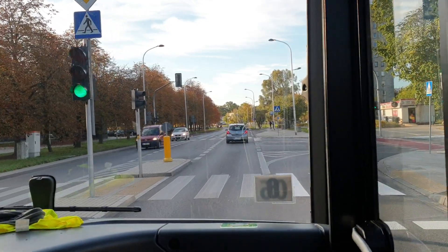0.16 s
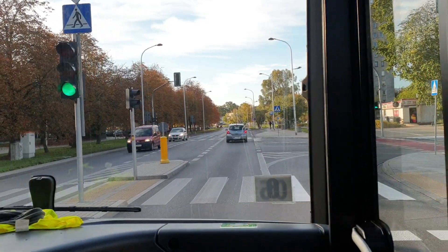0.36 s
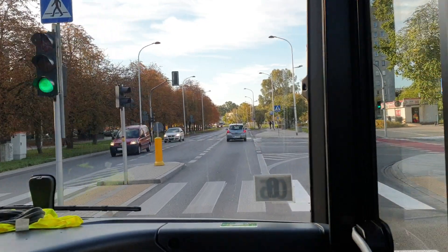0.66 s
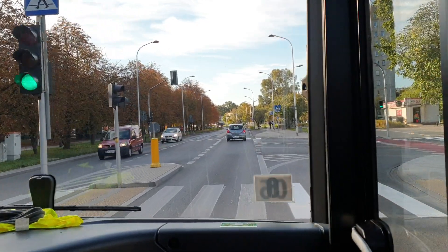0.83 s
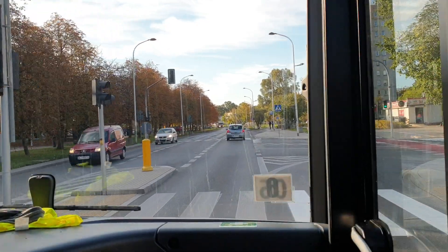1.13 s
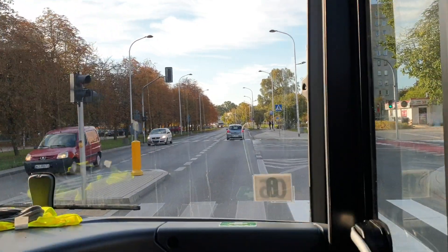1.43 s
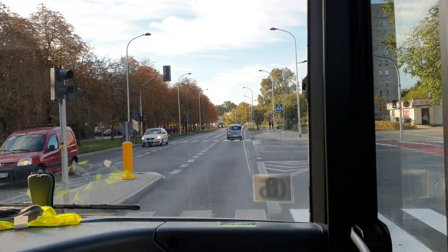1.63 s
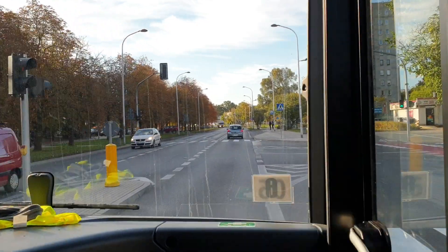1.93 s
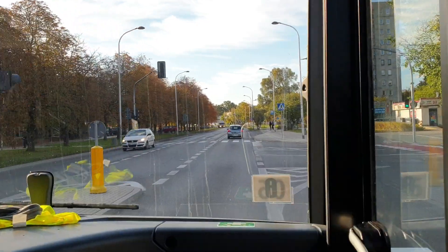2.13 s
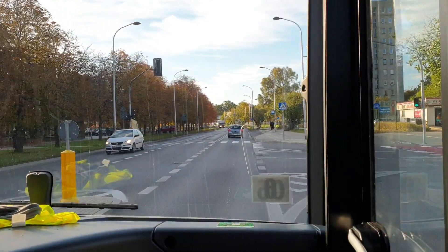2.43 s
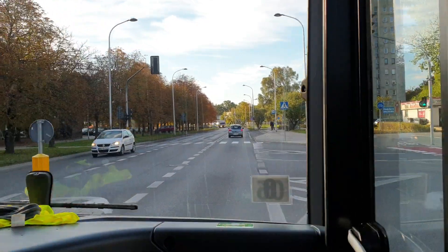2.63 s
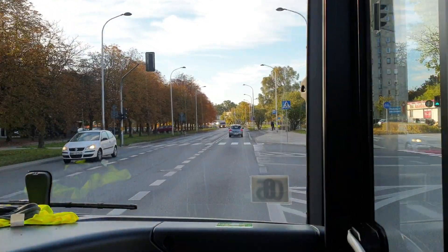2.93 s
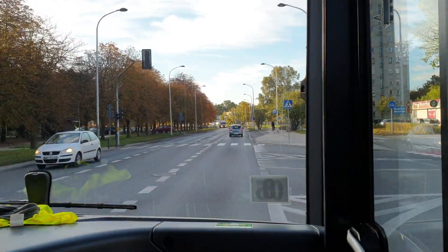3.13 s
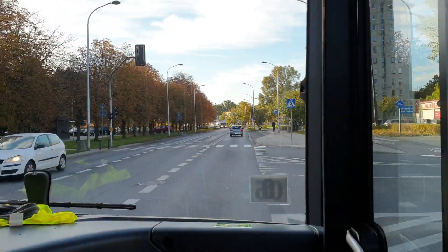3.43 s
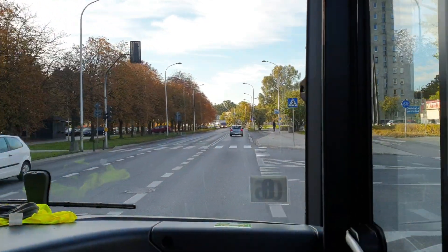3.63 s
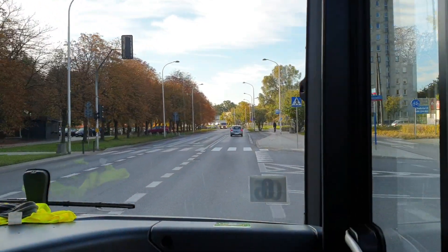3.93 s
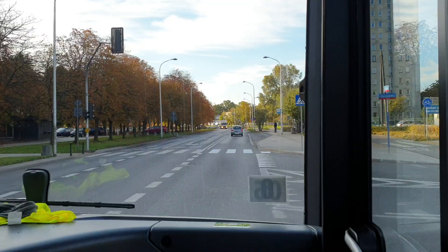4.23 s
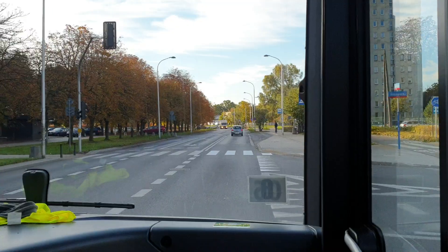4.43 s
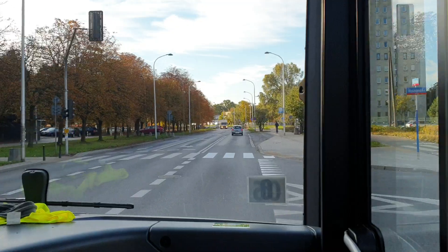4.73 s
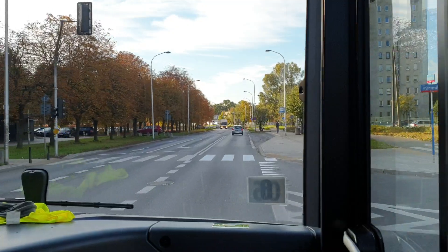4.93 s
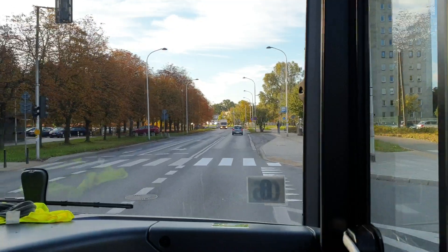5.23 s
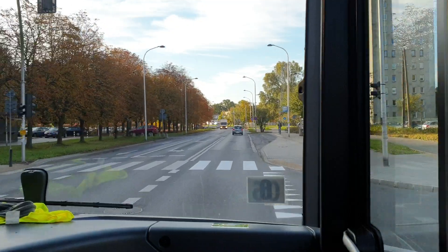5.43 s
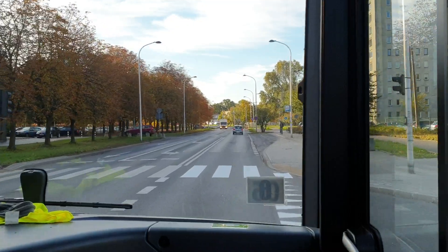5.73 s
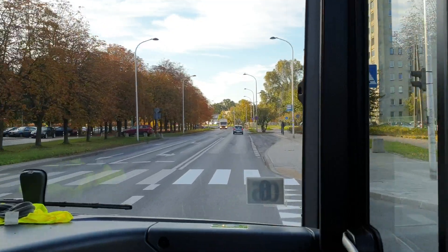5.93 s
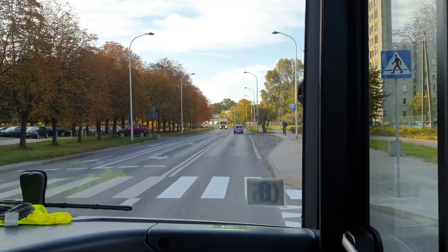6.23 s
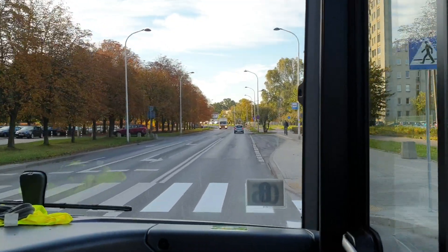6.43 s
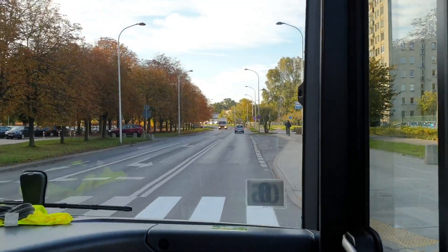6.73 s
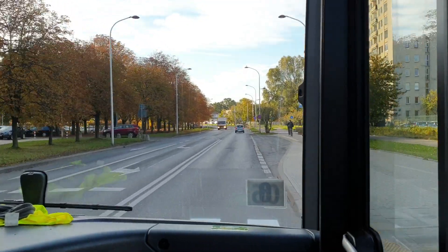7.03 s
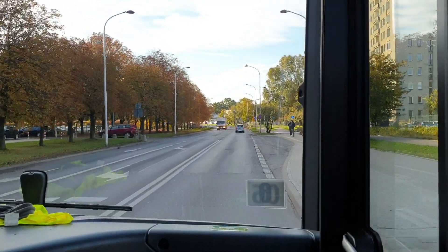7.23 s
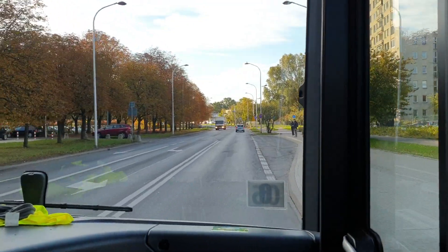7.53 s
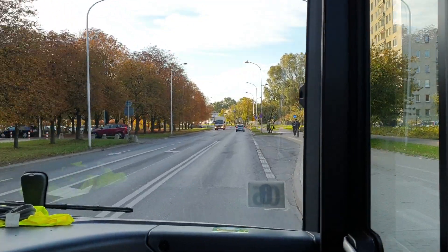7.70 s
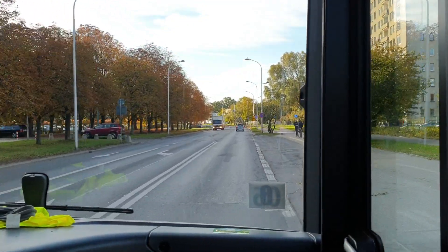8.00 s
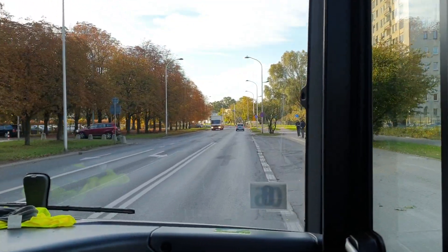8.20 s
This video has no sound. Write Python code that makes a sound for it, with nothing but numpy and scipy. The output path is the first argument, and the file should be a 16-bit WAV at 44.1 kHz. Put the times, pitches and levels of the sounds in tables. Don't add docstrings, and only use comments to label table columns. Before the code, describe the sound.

Steady low compressor drone inside an accelerating electric bus, with faint rising gear whine, tyre rumble, increasing panel rattle on the right and small air puffs.

```python
import sys
import numpy as np
from scipy import signal
from scipy.fft import rfft, irfft, next_fast_len
from scipy.io import wavfile
from scipy.ndimage import uniform_filter1d, map_coordinates

SR = 44100
rng = np.random.default_rng(int(sys.argv[2]) if len(sys.argv) > 2 else 0)


def invert_db(x):
    u = np.asarray(x, float) / 20
    return 10 ** u


def generate_wav(sig):
    pcm = np.round(np.clip(np.atleast_2d(sig).T, -1, 1) * 32767).astype(np.int16)
    wavfile.write(sys.argv[1], SR, pcm)


N = 368675

# (time [s], frequency [Hz])
GEAR_WHINE = [(0, 900), (1.1, 1330), (1.7, 1560), (2.4, 1790), (3.0, 1980), (3.8, 2170), (4.78, 2385),
              (5.1, 2445), (5.5, 2515), (5.9, 2548), (8.36, 2560)]
# (time [s], force on the low knock [1], on the body [1], on the edge [1])
PANEL_TAPS = [(3.0361, .1, 0.54, .6), (3.0779, 0.24, 1.3, .71), (3.256, .1, 0.36, .1),
              (3.494, 1.11, 1.8, 0.99), (3.6017, 1.1, 1.4, 0.91), (3.9409, .48, .75, .84),
              (3.9975, 0.11, .4, 0.47), (4.2714, 0.78, .99, 0.78), (4.3616, 0.67, 1.2, 0.98),
              (4.531, 0.93, 0.75, 1.2), (4.6272, 1.1, 0.38, 1.49), (4.7274, .83, 1.1, 0.5),
              (5.6879, 1, 0.55, 0.5), (5.7707, 1.28, 0.59, .9), (5.8306, .47, 1, 0.79),
              (5.8698, 1.9, 1.9, 1.02), (5.9204, .33, .78, 0.46), (5.9804, 0.58, 1.02, 1.3),
              (6.237, 0.87, 0.11, 1.28), (6.4527, 1, 0.51, .1), (6.6808, .4, 1.1, 0.55),
              (6.9888, 1.1, 0.95, 2.1), (7.13, 1.81, 1.9, 1.9), (7.6321, .1, 0.81, .49),
              (7.678, 1.6, 1.29, 1.88), (7.7216, .52, 1, 1), (7.8968, 1.3, 2.3, 0.4),
              (8.0092, 0.99, 1.7, 1.8), (8.1116, 1.2, 1.1, 0.84), (8.1653, 0.48, .61, .89),
              (8.2256, 1.46, 0.9, .18), (8.2728, 0.18, 0.84, .82), (8.3273, 1.33, 1.3, 0.43)]


def unit(x):
    return x / np.sqrt(np.mean(x ** 2) + 1e-20)


def along(points, hz):
    f, v = np.transpose(points)
    return np.interp(np.log(hz + 1), np.log(f + 1), v)


def shaped(spectrum):
    return lambda hz: invert_db(along(spectrum, hz))


def curves(rows):
    s, *cols = np.transpose(rows)
    return [np.interp(np.arange(N) / SR, s, c) for c in cols]


def wobble(rate_hz):
    knots = rng.standard_normal(int(N * 40 / SR) + 4)
    return map_coordinates(knots, [np.arange(N) * min(rate_hz, 40) / SR])


def gate(on_s, off_s, fade_s):
    t = np.arange(N) / SR
    opening = 1 + np.tanh((t - on_s) / fade_s * 2)
    closing = 1 + np.tanh((off_s - t) / fade_s * 2)
    return .25 * opening * closing


def filtered(x, response):
    m = next_fast_len(N + 8192)
    return irfft(rfft(x, m) * response(np.fft.rfftfreq(m, 1 / SR)), m)[..., :N]


def modes(table):
    def response(f):
        return sum((-1) ** k * invert_db(db) * 1j * f * w / (c * c - f * f + 1j * f * w)
                   for k, (c, w, db) in enumerate(table))
    return response


def rush(colour, patchy_db):
    # (frequency [Hz], correlation [1])
    likeness = [(30, 0.98), (60, 0.99), (140, 0.91), (220, 0.97), (340, .55), (530, 0.99), (830, -0.11),
                (1280, -0.78), (1980, 0.097), (3060, .1), (5000, -0.26), (9500, -0.14), (13000, -0.08)]
    # (frequency [Hz], level difference [dB])
    balance = [(60, -4), (220, -3.5), (340, 1), (530, -2.5), (830, 1), (1280, -14), (1980, -2), (3060, -1),
               (5000, -1), (9500, -0.5), (13000, -1)]
    z = signal.stft(rng.standard_normal((2, N)), nperseg=512)[2]
    field = uniform_filter1d(rng.standard_normal(z.shape[1:]), size=5, axis=0)
    field = uniform_filter1d(field, size=8, axis=1)
    pair = signal.istft(z * invert_db(patchy_db * unit(field)), nperseg=512)[1][:, :N]

    def mid_side(hz):
        angle = np.arccos(np.clip(along(likeness, hz), -1, 1)) / 2
        return colour(hz) * np.array([np.cos(angle), np.sin(angle)])

    mid, side = filtered(pair, mid_side)
    lean = lambda hz: invert_db(np.outer([.5, -.5], along(balance, hz)))
    return unit(filtered(np.array([mid + side, mid - side]), lean))


def tone(hz, db, pan_db, lead):
    phase = 2 * np.pi * np.cumsum(hz * np.ones(N)) / SR + 2 * np.pi * rng.random()
    ports = np.sin(phase + np.array([[lead / 2], [-lead / 2]]))
    return np.sqrt(2) * invert_db(db) * invert_db([[pan_db / 2], [-pan_db / 2]]) * ports


def bursts(rows, t60_s, rise_s):
    t = np.arange(N) / SR
    out = np.zeros(N)
    for (s, db), life in zip(rows, t60_s * np.ones(len(rows))):
        u = t[:int(life * SR)]
        part = out[round(s * SR):][:len(u)]
        decay = invert_db(db - 60 * u / life) * (1 - np.exp(-u / rise_s))
        part += decay[:len(part)]
    return out


def compressor():
    # (shaft multiple [1], rms level [dB], unsteadiness [dB], left-right [dB], left phase lead [rad])
    orders = [(1, -38.5, 1.5, -2.5, 0.5), (2, -20.5, 0.4, -2, 0.31), (4, -45.5, 1, -1, 0.36),
              (9, -59.5, 2.5, -1.5, 1.5), (13, -56.5, 0.5, -6.5, -1), (19, -73, 0.5, 2.5, -0.5),
              (26, -67.5, 3, -9.5, 2.5), (27, -64.5, -0.1, 1.5, 1.9), (29, -71.5, 0, -13, 6)]
    # (time [s], level [dB])
    course = [(0.0, -22.5), (0.72, -23.5), (3.89, -24), (4.8, -24), (5.42, -25), (5.66, -23.5), (6.78, -23.5),
              (6.845, -29), (6.9, -23.5), (7.1, -24), (8.22, -23.5), (8.36, -25)]
    shaft_hz = 102.42 / 2 * (1 + .0004 * wobble(3))
    course_db, = curves(course)
    course_db = course_db - course_db.mean()
    left_share = .4
    sinking = left_share + (1 - left_share) * gate(-3, off_s=5.9, fade_s=1.5)
    out = tone(48 * shaft_hz, -76 + 3 * wobble(7), 3, lead=1.13) * sinking
    for k, db, shake_db, pan_db, lead in orders:
        out = out + tone(k * shaft_hz, db + course_db + shake_db * wobble(7), pan_db, lead)
    return out


def traction():
    sweeps = [(.33, .62, 412, 458, -52.5), (.55, .9, 462, 480, -56), (.5, 1.05, 135, 166, -39.5),
              (1.2, 1.8, 140, 172, -41), (-.1, .55, 262, 262, -53), (2.6, 3.0, 82, 86, -39),
              (2.2, 2.75, 112, 122, -41), (2.9, 3.5, 122, 130, -42), (3.05, 3.35, 158, 162, -43),
              (.2, 1.1, 78, 88, -44), (6.6, 6.95, 36, 38, -38), (2.05, 2.5, 140, 156, -42),
              (3.25, 3.65, 4300, 4305, -85), (3.88, 4.13, 4305, 4310, -85), (4.1, 5.4, 5310, 5335, -89),
              (5.4, 6.1, 5335, 5345, -91), (5.45, 5.72, 5345, 5345, -86), (4.2, 5.9, 4670, 4655, -93),
              (.5, 4.2, 3741, 3741, -93), (3.96, 4.16, 3690, 3680, -84), (2.2, 2.7, 4290, 4295, -89),
              (-1, 3.0, 973, 973, -66)]
    hz, = curves(GEAR_WHINE)
    t = np.arange(N) / SR
    housing_hz, width_hz, gain_db = 2478, 52, 14
    db = -80 + gain_db * np.exp(-((hz - housing_hz) / width_hz) ** 2 / 2)
    pulling = gate(on_s=1.4, off_s=5.66, fade_s=.25)
    out = tone(hz + 3 * wobble(30), db + wobble(14), 2, lead=.6) * pulling
    for s0, s1, hz0, hz1, db in sweeps:
        u = np.clip((t - s0) / (s1 - s0), 0, 1)
        pitch_hz = (hz0 + (hz1 - hz0) * u) * (1 + .012 * wobble(15) * (hz0 < 500))
        swell = np.sqrt(np.abs(np.sin(np.pi * u)))
        out = out + tone(pitch_hz, db + 2.8 * wobble(10), -2, lead=.1) * swell
    return out


def inverter():
    carrier_hz, low_hz, aux_hz = 10001, 8000, 178
    whine_hz, = curves(GEAR_WHINE)
    offset_hz = whine_hz / 11
    awake = gate(-1, 6.25, .22)
    boost = gate(4.17, 5.62, .12)
    line = lambda hz, db: tone(hz + 3 * wobble(30), db + 3 * wobble(7), -3, lead=1.3)
    out = line(carrier_hz, -101 + 11.5 * awake + 7 * boost)
    for hash_hz, width_hz, db, patchy_db in ((9800, 900, -80.5, -1.5), (5000, 700, -83.5, 1.5)):
        peak = modes([(hash_hz, width_hz, 0)])
        out = out + invert_db(db) * boost * rush(lambda f: peak(f) ** 2, patchy_db)
    low = line(low_hz, -98) + line(low_hz - whine_hz, -100)
    low = low + line(low_hz - aux_hz, -105) + line(low_hz + aux_hz, -105)
    out = out + gate(.9, 4.17, .05) * low
    spread = awake * (.4 + boost) * gate(4.17, 9, .1)
    for way in (-1, 1):
        out = out + line(carrier_hz + way * offset_hz, -86 + 1.5 * way) * spread
        out = out + line(carrier_hz + way * aux_hz, -97)
    return out


def panel():
    # (time [s], strength [dB])
    touches = [(3.869, -40), (3.91, -36.5), (4.033, -38.5), (4.06, -45), (4.21, -39), (4.492, -35),
               (4.578, -34.5), (5.727, -32.5), (5.792, -34), (6.172, -35.5), (6.298, -37), (6.795, -37.5),
               (6.911, -35.5), (7.075, -46), (7.102, -37), (5.07, -45), (5.186, -43), (5.585, -35.5),
               (5.636, -41), (3.214, -48), (3.351, -47), (2.811, -48), (7.374, -39), (7.449, -45.5),
               (7.566, -42.5), (7.78, -41), (7.829, -38), (8.055, -41.5), (8.296, -32.5)]
    # (frequency [Hz], width [Hz], level [dB])
    knock = [(480, 98, 0.5), (635, 340, -7), (830, 250, -6.5), (286, 43, 1)]
    # (frequency [Hz], width [Hz], level [dB])
    body = [(1170, 70, 0.5), (1530, 170, 2.5), (1740, 280, -4)]
    # (frequency [Hz], width [Hz], level [dB])
    edge = [(2050, 100, 1), (2260, 140, 2.5), (2390, 130, 4), (2590, 180, -0.5), (3400, 700, -12)]
    s, *forces = np.transpose(PANEL_TAPS)
    at, touch_db = np.transpose(touches)
    # resonances, tap gain dB, touch gain dB, t60 s, far port dB
    parts = ((knock, -1, 35.5, .05, -5), (body, -10.5, 25, .075, -9), (edge, -15.5, 17.5, .06, -4))
    out = 0
    for force, (table, tap_gain_db, touch_gain_db, t60_s, far_db) in zip(forces, parts):
        tap_db = 20 * np.log10(np.abs(force) + .01) + tap_gain_db
        hits = np.c_[np.r_[s, at], np.r_[tap_db, touch_db + touch_gain_db]]
        chatter = invert_db(-14.5) * rng.standard_normal((2, N)) * bursts(hits, t60_s, rise_s=.00048)
        out = out + filtered(chatter * invert_db([[far_db], [0]]), modes(table))
    soft_hz = 3530
    return taps() + filtered(out, lambda f: 1 / (1 + 1j * f / soft_hz) ** 4)


def taps():
    # (frequency [Hz], t60 [s], left swing [1], right swing [1])
    struck = [
        [(322, .074, 10.3, 3.6), (485, .027, -8.9, 16.8), (579, .052, 4.3, 20.1), (777, .024, 8, -7.5),
         (902, .019, -8.1, -9.2)],
        [(1101, .1, -1.4, -3.3), (1415, .041, 1.7, 10.3), (1513, .034, -1.7, -5.6), (1636, .033, .5, -5.7)],
        [(1873, .047, -.7, .7), (2112, .042, -.7, 1), (2278, .012, 2.7, 5.2), (2407, .042, .6, 1.6),
         (2747, .01, -.1, -2.1)],
    ]
    # (delay [s], gain [1])
    echo = [(.00414, 1.04), (.005, -.57)]
    s, *forces = np.transpose(PANEL_TAPS)
    t, out = np.arange(SR // 8) / SR, np.zeros((2, N))
    for force, table in zip(forces, struck):
        hz, t60_s, *swing = np.transpose(table)
        sines = np.sin(2 * np.pi * np.outer(hz, t)) * invert_db(-60 * t / t60_s[:, None])
        ring = np.array(swing) @ sines
        hits = np.bincount((s * SR).astype(int), force, N)
        out = out + signal.fftconvolve(hits[None], ring, axes=1)[:, :N]
    delay_s, gain = np.transpose(echo)[..., None]
    return invert_db(-60.5) * filtered(out, lambda f: 1 + gain * np.exp(-2j * np.pi * f * delay_s))


def valve():
    # (time [s], peak level [dB], hose over jet [dB])
    puffs = [(.003, -58, -11.5), (0.12, -64, 0.5), (.415, -66, -10), (0.4432, -64.5, -10),
             (.765, -67.5, -8), (1.0498, -63.5, -2), (1.1424, -63.5, -13), (1.4185, -67.5, -13),
             (1.929, -65.5, -14), (2.019, -67, -5.5), (3.035, -67.5, -4.5), (3.349, -61, -5.5),
             (3.493, -65, 6.5), (4.2498, -69, -3.5), (5.398, -65, -6.5), (5.4541, -59, -2.5),
             (5.867, -64.5, 5), (6.13, -57.5, -9), (6.176, -59.5, -1), (6.527, -57, 8), (6.72, -58, -28),
             (6.75, -62.5, -12), (6.791, -61, 7), (6.82, -63, 5), (6.852, -61, -3), (6.885, -62.5, -1.5),
             (6.99, -53.5, -3.5), (7.354, -62, -13.5), (7.375, -65.5, -13.5), (7.5, -64.5, -25),
             (7.5731, -61, -3.5), (7.6095, -65, 1), (7.713, -59, 1.5), (7.83, -72, 10), (8.166, -60, -10),
             (8.335, -62.5, -3), (8.19, -60.5, -6), (8.3138, -58.5, 3.5)]
    # (time [s], peak level [dB], t60 [s], hose over jet [dB])
    spits = [(5.454, -63.5, .1, -6), (6.99, -62.5, .05, 0), (7.142, -61.5, .06, -10),
             (7.245, -64.5, .05, -11), (7.467, -64, 0.052, -15.5), (7.709, -51.5, 0.029, -1),
             (8.312, -63.5, 0.03, 3.5), (3.349, -68.5, 0.038, -1), (5.867, -70, 0.045, 12)]
    # (frequency [Hz], density [dB per Hz])
    jet_colour = [(4200, -32.5), (5100, -8.5), (5600, -18), (7000, -16.5), (8600, -13.5), (9200, 1),
                  (10500, -0.5), (11500, -2), (12000, -14.5), (15700, -20)]
    # (frequency [Hz], density [dB per Hz])
    hose_colour = [(1800, -23), (2800, 0.5), (3200, -0.5), (4200, -2.5), (5300, -4.5), (5700, -10.5),
                   (7500, -17), (9000, -42.5)]
    # (frequency [Hz], width [Hz], level [dB])
    bore = [(3100, 180, 0.5), (3900, 220, -7.5), (5000, 110, 1.5)]
    s, puff_db, puff_hose_db = np.transpose(puffs)
    at, spit_db, spit_t60_s, spit_hose_db = np.transpose(spits)
    puff_db, puff_t60_s = puff_db - 7, .33
    jet = bursts(np.c_[s, puff_db], puff_t60_s, rise_s=.0096)
    jet = jet + bursts(np.c_[s, puff_db - 10], .073, rise_s=.0016)
    jet = jet + bursts(np.c_[at, spit_db], spit_t60_s, rise_s=.00034)
    hose = bursts(np.c_[s, puff_db + puff_hose_db], puff_t60_s, rise_s=.0036)
    hose = hose + bursts(np.c_[at, spit_db + spit_hose_db], spit_t60_s, rise_s=.00055)
    hose_gain = lambda f: shaped(hose_colour)(f) * (1 + abs(modes(bore)(f)))
    return jet * rush(shaped(jet_colour), patchy_db=1.5) + hose * rush(hose_gain, patchy_db=.5)


def case():
    # (time [s], peak level [dB], pulse frequency [Hz], decay [cycles], left-right [dB])
    ticks = [(.1606, -47, 2500, 1.1, 4), (.1668, -32, 1100, .42, -18.5), (.1682, -46, 2400, .9, -12),
             (.1669, -47, 10870, 2.2, -24), (.168, -35, 800, .6, -25), (.1681, -39, 12500, 1.2, -24),
             (.3471, -44.5, 1990, .7, -12), (.3475, -46, 800, .7, -8), (.6336, -30.5, 800, .36, 19),
             (.6372, -48, 3005, .7, 11), (.6579, -28, 850, .14, 28), (.6578, -40, 600, .8, 24),
             (.658, -40, 1750, 1.5, 15), (.658, -42, 4200, .7, 15), (.6658, -24.5, 620, .8, 21.5),
             (.6659, -34.5, 2000, 1.6, 6), (.666, -42, 3800, .8, 14), (.6678, -29, 250, 1.2, 12),
             (1.12, -48, 900, 1.1, -2.5), (3.0358, -45, 3020, .46, -3.5), (.6391, -53, 3000, .7, 11),
             (.591, -57, 3000, .8, 3), (.648, -57, 4000, .8, 11), (.6545, -55, 4500, .8, 11),
             (8.345, -52, 6010, .51, -6), (8.358, -50, 7000, .56, 0)]
    out, t = np.zeros((2, N + SR)), np.arange(SR // 20) / SR
    for s, db, hz, cycles, pan_db in ticks:
        swing = np.sin(2 * np.pi * hz * t) * np.exp(-t * hz / cycles)
        swing = swing * (1 - np.exp(-(t * hz / .15) ** 2))
        out[:, round(s * SR):][:, :len(t)] += invert_db(db + 4) * swing * invert_db([[pan_db / 2], [-pan_db / 2]])
    dull = lambda f: invert_db(-14 * np.exp(-((f - 8000) / 1800) ** 2))
    return filtered(out[:, :N], dull)


def joints():
    # (time [s], peak level [dB], frequency [Hz], t60 [s])
    bumps = [
        (6.827, -30.5, 94, 0.092),
        (8.299, -26.5, 71.3, 0.2),
    ]
    t, out = np.arange(SR // 4) / SR, np.zeros(N + SR)
    for s, db, hz, t60_s in bumps:
        thump = invert_db(db - 60 * t / t60_s) * np.sin(2 * np.pi * hz * t) * (1 - np.exp(-t / .009))
        out[round(s * SR):][:len(t)] += thump
    return out[:N] * invert_db([[-1], [1]])


def surges():
    # (time [s], frequency [Hz], rms level [dB], length [s])
    swells = [(0.024, 55.43, -30, 0.09), (0.342, 61.8, -34, 0.048), (0.819, 55.56, -29.5, 0.052),
              (1.651, 53.73, -29, 0.064), (1.817, 56.44, -29, 0.05), (2.068, 56.1, -24, 0.106),
              (2.245, 57.06, -25, 0.05), (2.402, 59.6, -19.5, 0.1), (2.49, 57.6, -30.5, 0.05),
              (2.637, 57.3, -22.5, 0.062), (2.742, 61.6, -21.5, 0.069), (2.822, 59.76, -22, 0.15),
              (2.926, 59.36, -20, 0.082), (3.074, 57.1, -21.5, 0.061), (3.23, 56.33, -24, 0.082),
              (3.344, 60.0, -23.5, 0.057), (3.418, 60.06, -27.5, 0.05), (3.481, 59.94, -32.5, 0.05),
              (3.598, 60.15, -29.5, 0.074), (3.881, 54.57, -28.4, 0.056), (3.985, 55.55, -32.5, 0.05),
              (4.427, 56.17, -29, 0.076), (5.262, 56.96, -31.5, 0.045), (5.481, 55.84, -24.5, 0.046),
              (5.647, 57.26, -27, 0.058), (5.916, 56, -26.5, 0.11), (6.143, 56.3, -33, 0.05),
              (6.263, 60.1, -33.5, 0.078), (6.345, 54, -29.5, 0.05), (6.448, 58.9, -25.5, 0.059),
              (6.552, 56.8, -25.5, 0.058), (6.64, 59.4, -27, 0.043), (6.732, 54.3, -28, 0.054),
              (6.808, 52.2, -27, 0.05), (6.886, 56.3, -26.8, 0.05), (6.967, 52.35, -27.0, 0.05),
              (7.057, 56.6, -26, 0.05), (7.204, 59.1, -26.5, 0.052), (7.366, 57.76, -33.5, 0.05),
              (7.522, 57, -31.0, 0.075), (7.611, 60, -31.5, 0.061), (7.706, 55.6, -30.7, 0.05),
              (7.803, 59.5, -28, 0.05), (7.89, 52, -22, 0.058), (7.958, 51.5, -33, 0.059),
              (8.063, 62.2, -29.3, 0.05), (8.167, 59.4, -27.5, 0.059), (8.299, 60.05, -24, 0.043)]
    t = np.arange(N) / SR
    power = sum(invert_db(2 * db) * 2 ** (-2 * (2 * (t - s) / length) ** 2) for s, hz, db, length in swells)
    return tone(curves(swells)[0], -1.3, -1.6, lead=.49) * np.sqrt(power)


def road():
    # (time [s], level [dB])
    surface = [(0.0, -38.5), (0.35, -40.5), (0.74, -39), (1.21, -40.5), (1.44, -39.5), (3.82, -39),
               (4.12, -38), (4.58, -39.5), (5.66, -38.5), (6.66, -39), (6.89, -36.5), (7.54, -39.5),
               (7.89, -38), (8.36, -36.5)]
    # (level [dB], share of roughness [1], share of speed in dB [1])
    layers = dict(boom=(-39, 1, 0.04), rumble=(-38, 2.4, 0.095), roar=(-46.5, 1, 0.2),
              fizz=(-72, 0.54, 0.22))
    # (frequency [Hz], width [Hz], level [dB])
    air_modes = [(66.6, 16, 0), (38.7, 7.3, -4), (70, 7.1, -7.5), (27, 7.9, -9)]
    # (frequency [Hz], density [dB per Hz])
    rumble_colour = [(12, -67), (20, -37), (29, -17), (40, -8), (60, -6), (75, -19), (87, -8.5), (108, 3),
                     (120, -11.5), (130, -8), (206, -17.5), (232, -15.5), (500, -50.5), (650, -76),
                     (1100, -120)]
    # (frequency [Hz], density [dB per Hz])
    roar_colour = [(180, -28.5), (300, -10.5), (384, -10.5), (459, -5), (487, -15.5), (577, -3),
                   (618, -9.5), (676, -12.5), (703, -10.5), (1370, -17.5), (2260, -30), (2500, -31),
                   (3200, -43), (4160, -76.5), (7040, -120)]
    # (frequency [Hz], density [dB per Hz])
    fizz_colour = [(2000, -21), (2700, -4.5), (3200, 3), (4000, 0), (5200, -8), (5600, -22.5), (7500, -33),
                   (8800, -27), (9100, -9), (10500, -9), (13000, -11.5), (15700, -15)]
    # (frequency [Hz], width [Hz], level [dB])
    duct_modes = [(571.3, 3.4, 2), (259.4, 9.8, 3.5), (1140, 20, -15)]
    # (frequency [Hz], width [Hz], level [dB])
    floor_modes = [(330, 130, 0), (260, 32, -3)]
    # (on [s], off [s], gain [dB])
    leaks = [(2.052, 3.399, 3.5), (3.901, 4.844, 3.5), (6.725, 7.111, 4), (7.663, 7.909, 3.5),
             (8.202, 8.5, 5.5)]
    (rough_db,), (speed,) = curves(surface), curves(GEAR_WHINE)
    rough_db = rough_db - rough_db.mean()
    speed_db = 20 * np.log10(speed / speed.max())
    boom_db, rumble_db, roar_db, fizz_db = (db + a * rough_db + b * speed_db for db, a, b in layers.values())
    boom = invert_db(boom_db) * rush(lambda f: modes(air_modes)(f) * (f < 130), patchy_db=-2)
    notch = lambda f: shaped(rumble_colour)(np.where(abs(f - 102) < 16, 125, f)) * (f > 72)
    rumble = invert_db(rumble_db + .44 * wobble(3)) * rush(notch, patchy_db=-.8)
    roar = invert_db(roar_db + 1.2 * wobble(10)) * rush(shaped(roar_colour), patchy_db=1.2)
    duct = invert_db(-48.5 + .39 * speed_db + .93 * wobble(6.3)) * rush(modes(duct_modes), patchy_db=-.15)
    floor_db = -52 + 1.3 * speed_db + .6 * rough_db
    floor = invert_db(floor_db) * rush(lambda f: modes(floor_modes)(f) ** 2, patchy_db=3.5)
    leak_db = sum(db * gate(on_s, off_s, fade_s=.1) for on_s, off_s, db in leaks)
    fizz = invert_db(fizz_db - 3.5 + leak_db) * rush(shaped(fizz_colour), patchy_db=2.5)
    return boom + rumble + roar + duct + floor + fizz


def scene():
    machines = compressor() + traction() + inverter()
    return machines + panel() + valve() + case() + joints() + surges() + road()


def band_limit(x):
    return signal.sosfilt(signal.butter(12, 15750, fs=SR, output="sos"), x)


def record(dry):
    opening = np.minimum(np.arange(N) / SR / .003, 1)
    return band_limit(dry * opening)


dry = scene()
out = record(dry)
generate_wav(out)
```